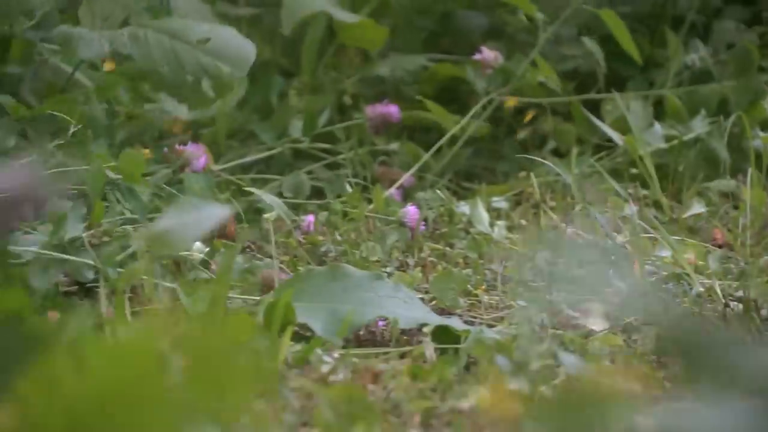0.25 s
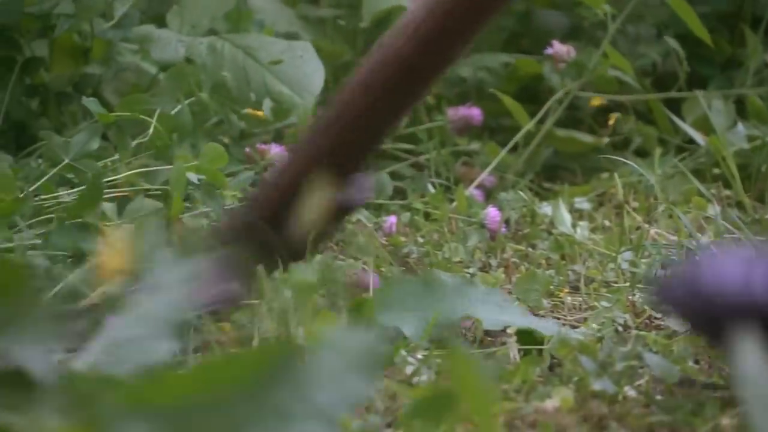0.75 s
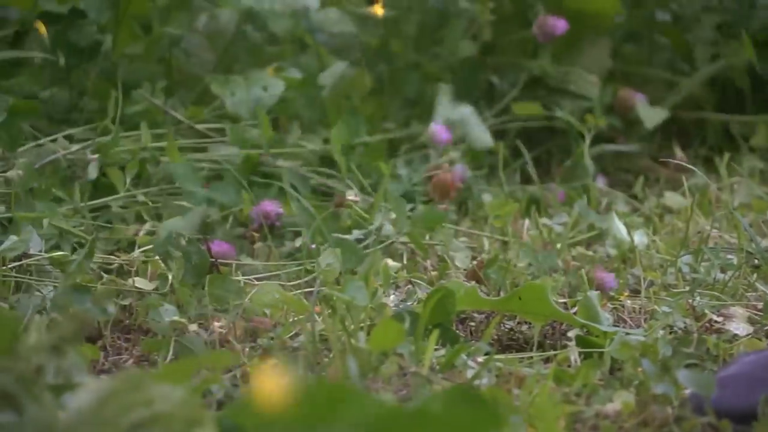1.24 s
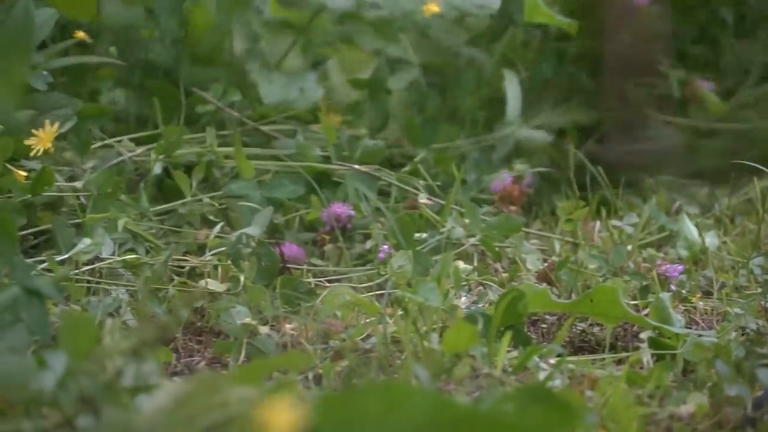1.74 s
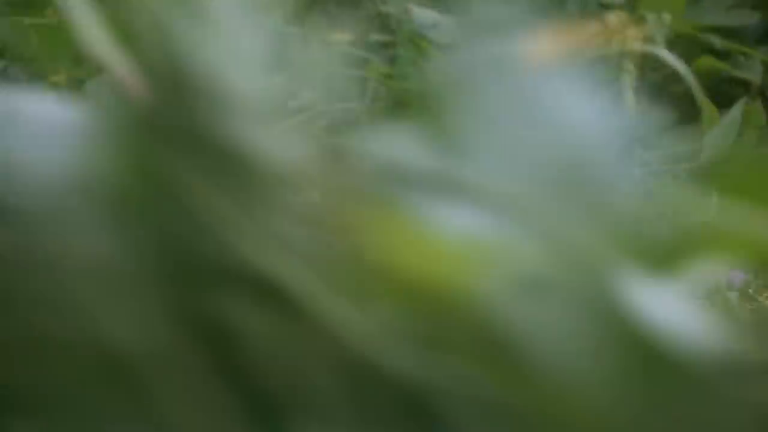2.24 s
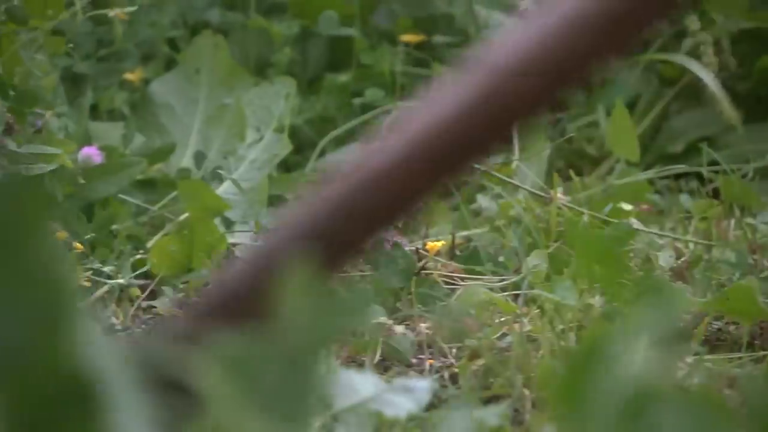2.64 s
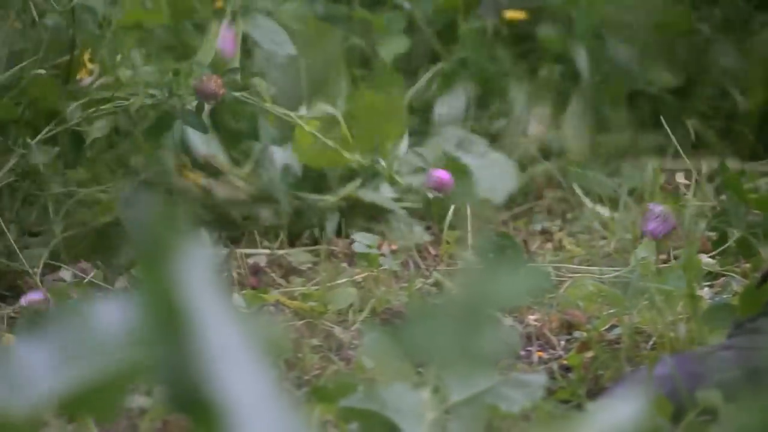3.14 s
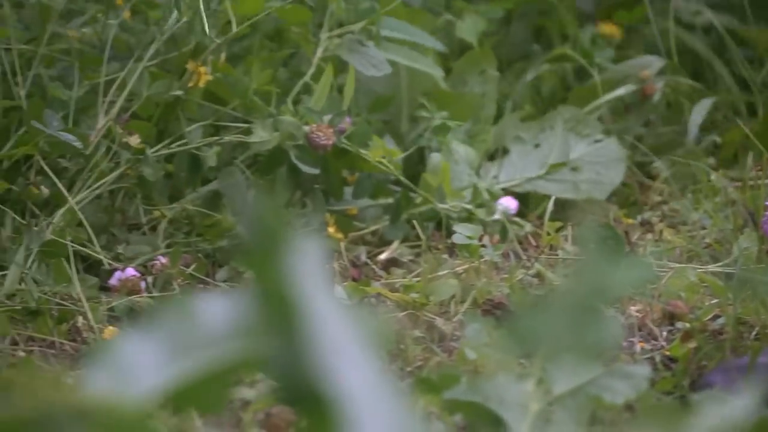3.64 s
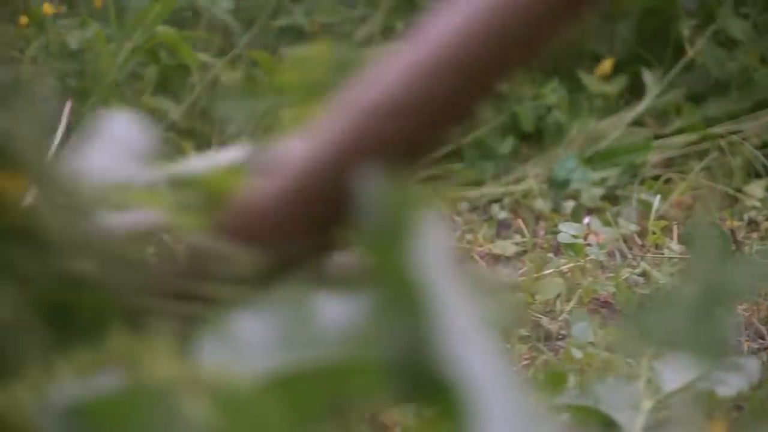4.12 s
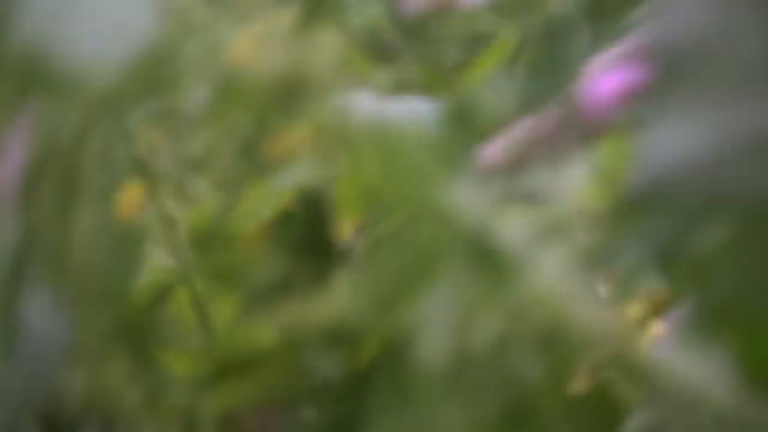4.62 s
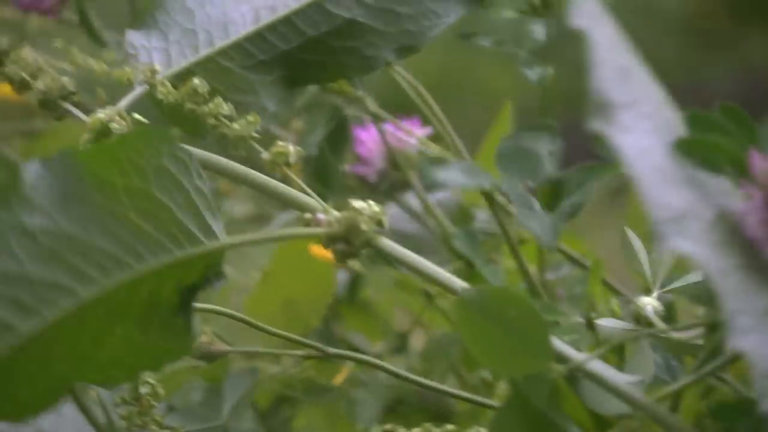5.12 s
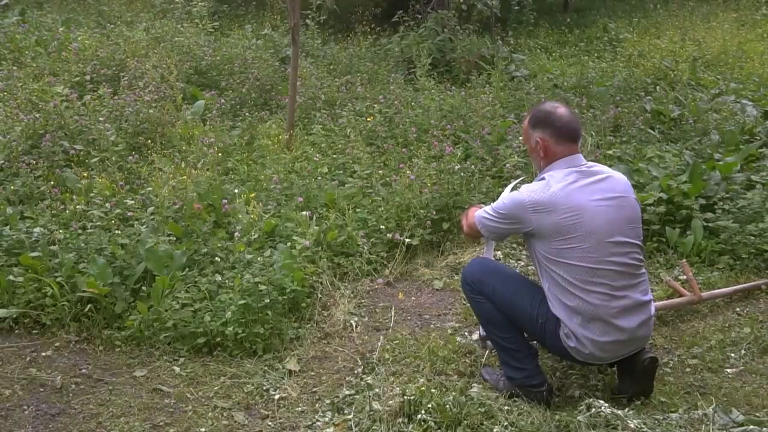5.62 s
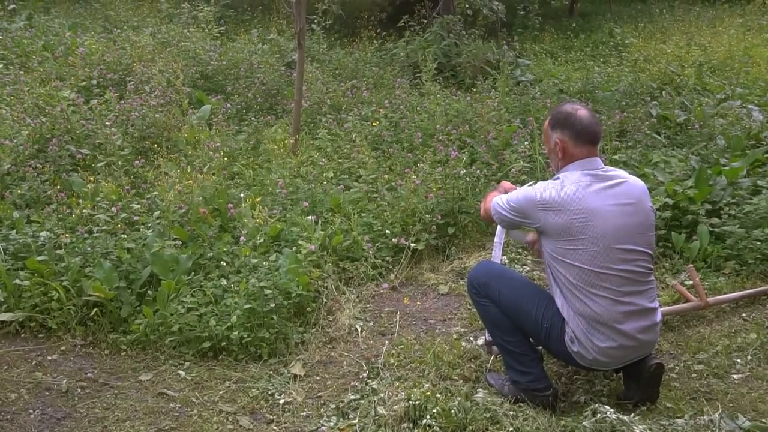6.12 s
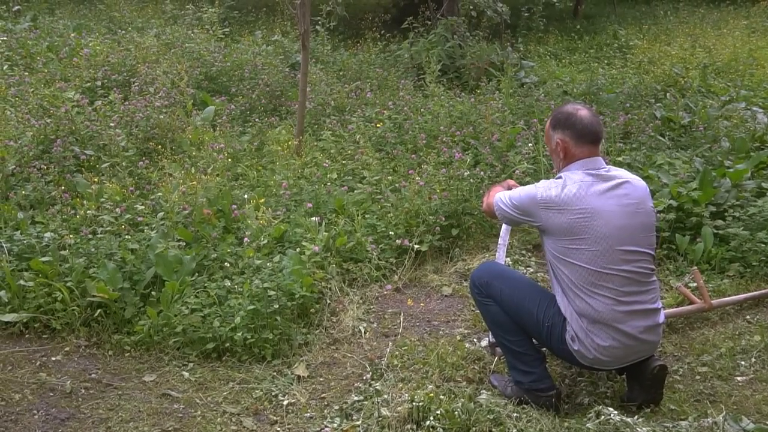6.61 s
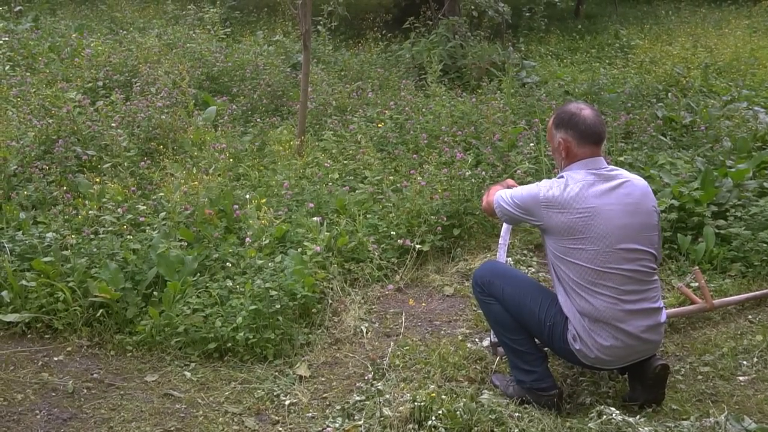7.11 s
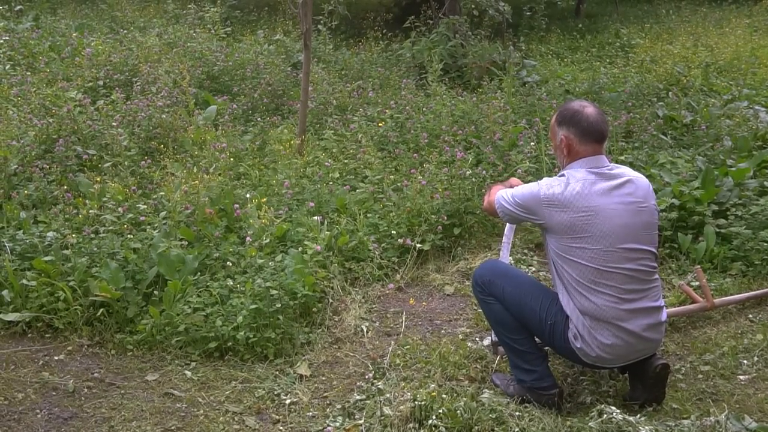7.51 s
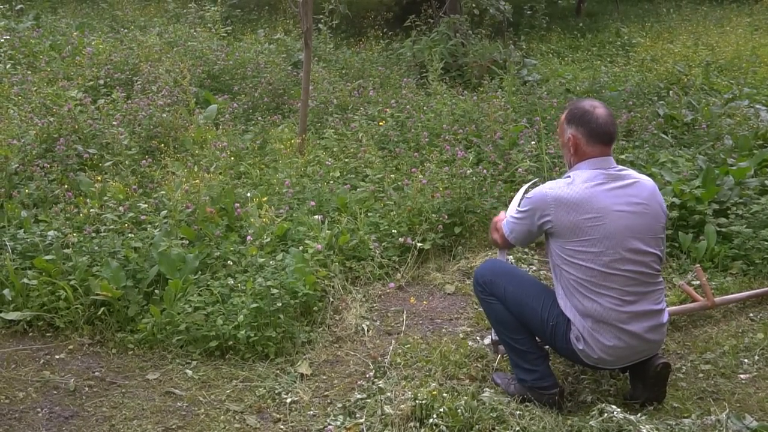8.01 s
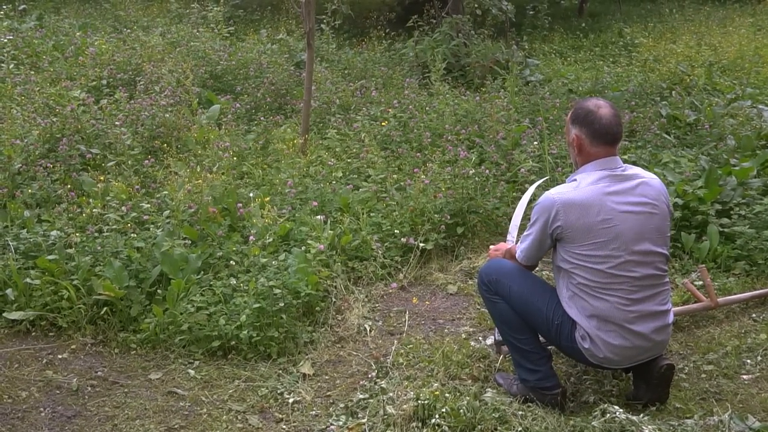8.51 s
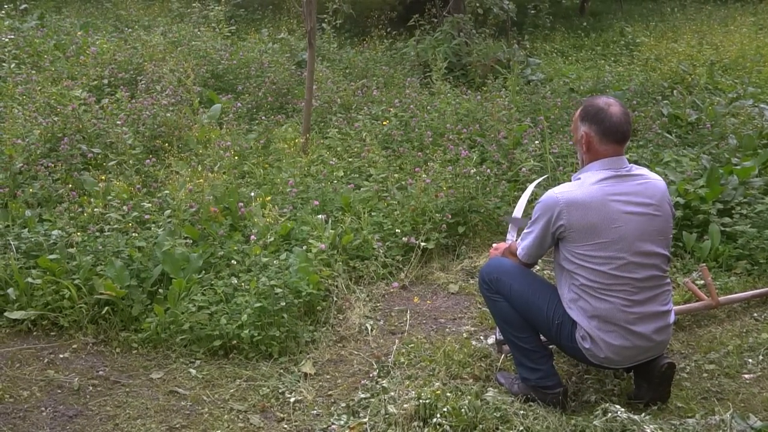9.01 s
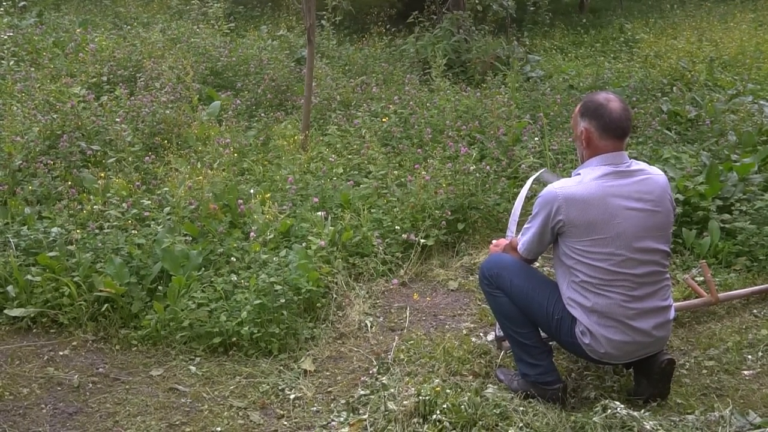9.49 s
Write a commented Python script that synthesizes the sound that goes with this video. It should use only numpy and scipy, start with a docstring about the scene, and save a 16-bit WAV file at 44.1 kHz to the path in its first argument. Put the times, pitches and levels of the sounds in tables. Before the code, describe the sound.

For the first 5.4 seconds a scythe cuts meadow weeds, heard close to the ground. Quick, uneven sweeps rustle and crunch as leaves tear, stems snap, the blade thumps dully and its back swishes over stubble. The cutting is strongest around 2 seconds and from 3.7 to 4.8. Low wind rumbles in gusts, peaking just after 3 seconds, and a distant bird whistles near 1.5.

At 5.4 seconds the sound jumps to a few steps away. A whetstone rasps along the blade in short, bright, gritty strokes, about two a second, its knocks setting the steel ringing with faint thin squeals. The strokes pause around 7.7, leaving a few dry ticks and a bird chirp, then four more with firmer knocks follow from 8.3 to 9.6. Underneath, a soft hiss of far leaves and insects slowly swells, with light wind and scattered distant bird notes.

```python
"""A scythe rustles and crunches through meadow weeds, close to the ground in a gusty breeze: leaves tear,
stems snap, the blade thumps the ground and its back swishes over stubble. Then, from a few steps away, a
whetstone rasps along the blade in short strokes, its grit and its knocks setting the steel ringing. Far
leaves and insects fill the quiet between the strokes; distant birds call in both scenes."""
import sys
import numpy as np
from scipy import signal
from scipy.fft import rfft, irfft
from scipy.io import wavfile
from scipy.ndimage import uniform_filter1d

SR = 44100
rng = np.random.default_rng(int(sys.argv[2]) if len(sys.argv) > 2 else 0)


def wrap_up_sound(samples):
    """Save the sound to the file named by the first command line argument, as 16-bit audio."""
    columns = np.atleast_2d(samples).T
    # keep every value between -1 and 1, then stretch to whole-number steps
    tamed = np.clip(columns, -1, 1)
    steps = np.round(tamed * 32767).astype(np.int16)
    wavfile.write(sys.argv[1], SR, steps)


N = 429975
CUT_S = 5.411  # the listener jumps from the grass to a few steps away

# stereo image from a few steps away: f/Hz, left-right likeness
FAR_LIKENESS = [(60, 0.99), (130, 0.87), (290, 0.86), (640, 0.76), (1410, 0.1), (3100, 0.24), (6820, 0.3),
                (15000, 0.77)]
# its tilt: f/Hz, left over right/dB
FAR_TILT = [(60, 5), (120, -5), (240, 3), (480, -2), (950, -3), (1890, -4.5), (3770, -0.5), (7520, 10),
            (15000, 1.5)]
# its phase: f/Hz, left lead/rad
FAR_LEAD = [(60, 6.1), (600, -0.5), (1120, 0), (2200, -3.5), (3190, -5.5), (9000, -9), (16000, -4)]
# the stone knocks on the steel: t/s, ring/dB, crack/dB, crack t60/s, thud/dB
STONE_KNOCKS = [(5.558, -58, -54, 0.084, -55), (5.719, -50, -52, 0.055, -57),
                (6.037, -46.5, -39.5, 0.11, -59), (6.115, -43, -40, 0.058, -51),
                (6.24, -44, -60, 0.043, -55), (6.502, -37.5, -34.5, 0.12, -50),
                (6.949, -55, -72, 0.062, -52), (7.385, -47, -58, 0.048, -49), (7.649, -55, -45, 0.052, -59),
                (8.324, -37, -42, 0.08, -41), (8.332, -39, -39, 0.13, -41), (8.456, -40, -39, .06, -47),
                (8.72, -37.5, -35, 0.11, -38), (8.845, -55, -38, 0.037, -41.5),
                (9.137, -47, -38, 0.073, -36), (9.229, -41, -38, 0.095, -42), (9.493, -52, -48, 0.078, -48),
                (9.581, -51, -33, 0.077, -55), (9.614, -49, -32.5, 0.094, -39)]


def gain_of(db):
    """Decibels to a factor."""
    return 10 ** (np.asarray(db) / 20)


def unit_rms(x):
    """Scaled to rms 1."""
    return x / np.sqrt(np.mean(x ** 2) + 1e-20)


def read(points, hz):
    """A (f/Hz, value) table on a log-frequency axis."""
    f, value = np.transpose(points)
    return np.interp(np.log(hz + 1), np.log(f + 1), value)


def curve(points):
    """A (t/s, value) table, one value a sample."""
    return np.interp(np.arange(N) / SR, *np.transpose(points))


def wander(shape, *sizes):
    """Random drift at rms 1, smoothed over each size in turn."""
    drift = rng.standard_normal(shape)
    for size in sizes:
        drift = uniform_filter1d(drift, size)
    return unit_rms(drift)


def plateau(start, end, start_db, end_db, rise, fall):
    """A level in dB that climbs at rise dB/s, slides from start to end and sinks at fall dB/s."""
    t = np.arange(N) / SR
    held = np.interp(t, [start, end], [start_db, end_db])
    return held - rise * np.maximum(start - t, 0) - fall * np.maximum(t - end, 0)


def bursts(rows):
    """Envelope of sudden blows that die away. Rows: t/s, level/dB, t60/s."""
    out = np.zeros(N)
    for start, db, t60 in rows:
        part = out[round(start * SR):][:SR // 4]
        t = np.arange(len(part)) / SR
        part += gain_of(db - 60 * t / t60) * np.minimum(t / 0.0006, 1)
    return out


def grains(grain_db, size):
    """Two white noises that share one lumpy envelope of short grains."""
    lumps = wander(N, size)
    return rng.standard_normal((2, N)) * gain_of(grain_db * lumps)


def placed(pair, likeness, tilt, lead=((0, 0), (1, 0)), patchy_db=0):
    """A noise pair spread in stereo and made patchy: a frequency column and short-time spectra."""
    hz, _, (left, other) = signal.stft(pair, SR, nperseg=512, noverlap=384)
    hz = hz[:, None]
    alike = read(likeness, hz)
    right = (alike * left + np.sqrt(1 - alike ** 2) * other) * np.exp(-1j * read(lead, hz))
    patches = uniform_filter1d(rng.standard_normal(right.shape), size=4, axis=0)
    patches = unit_rms(uniform_filter1d(patches, size=14, axis=1))
    lean = gain_of(read(tilt, hz) / 2)
    return hz, np.array([left * lean, right / lean]) * gain_of(patchy_db * patches)


def coloured(spectra, colour_db):
    """Short-time spectra back to sound through an EQ curve, the mid signal at rms 1."""
    x = signal.istft(spectra * gain_of(colour_db), SR, nperseg=512, noverlap=384)[1][:, :N]
    return x / np.sqrt(np.mean(x.mean(0) ** 2))


def band(noise, edges_hz, order):
    """Band-passed noise at rms 1."""
    bandpass = signal.butter(order, np.clip(edges_hz, 50, 18000), "band", fs=SR)
    return unit_rms(signal.lfilter(*bandpass, noise))


def clicks(rows, spread, crack_db):
    """Noise blows, each a narrow ring of its colour over a broad crack."""
    out, noise = np.zeros(N), rng.standard_normal(N)
    for start, db, hz, t60 in rows:
        at = slice(round(start * SR), round(start * SR) + SR // 4)
        ring = band(noise[at], [hz / spread, hz * spread], order=1)
        crack = band(noise[at], [hz / 2, hz * 2], order=1)
        out[at] += (ring + gain_of(crack_db) * crack) * bursts([(start, db, t60)])[at]
    return out


def whistles(rows, unsteady, fade_db):
    """Thin tones that glide, fast at first, waver and fade by fade_db (swell if negative)."""
    out = np.zeros(N)
    for start, end, start_hz, end_hz, db in rows:
        part = out[round(start * SR):round(end * SR)]
        pitch_waver, level_waver = wander((2, len(part)), 250)
        along = np.linspace(0, 1, len(part))
        glide = (end_hz + (start_hz - end_hz) * (1 - along) ** 2) * (1 + unsteady * pitch_waver)
        level = gain_of(db + 3.1 * level_waver - fade_db * along ** 2)
        part += level * signal.windows.tukey(len(part), .4) * np.sin(2 * np.pi * np.cumsum(glide) / SR)
    return out


def resonate(x, hz, width):
    """One mode, gain 1 at its centre."""
    r = np.exp(-np.pi * width / SR)
    return 2 * signal.lfilter([1 - r], [1, -r * np.exp(2j * np.pi * hz / SR)], x).real


def breeze(close):
    """Lumpy low wind rumble, nearly mono and a little louder on the left."""
    # wind strength, one curve in the grass and one a few steps away: t/s, level/dB
    strengths = [
        [(0, -49), (.3, -44), (.6, -41.5), (1.6, -40), (2.1, -38.5), (2.25, -36), (2.55, -37.5), (3.2, -26.5),
         (3.4, -32.5), (3.72, -30.5), (3.82, -40.5), (4.45, -34), (4.58, -30), (4.85, -36), (5.4, -34)],
        [(5.43, -52), (6.3, -55), (7.0, -53.5), (7.9, -54), (8.1, -52), (9.33, -46.5), (9.75, -46)],
    ]
    # rumble colour in the same two spots: f/Hz, level/dB
    gust = [(13, -30), (22, -19), (63, 1.5), (128, 2), (144, 2), (169, -10), (200, -5.5), (336, -16.5),
            (420, -20.5), (550, -23.5), (920, -120)]
    lull = [(13, -42), (22, -22), (64, 4), (103, 5.5), (266, -6), (358, -21), (420, -45), (550, -46),
            (920, -120)]
    strength, colour = (strengths[0], gust) if close else (strengths[1], lull)
    hz = np.fft.rfftfreq(N, 1 / SR)
    mid, side = irfft(rfft(rng.standard_normal((2, N))) * gain_of(read(colour, hz)), N)
    rumble = unit_rms(np.array([mid + 0.048 * side, mid - 0.025 * side]))
    return gain_of(curve(strength) + 1.37 * wander(N, 1500, 1500) + [[.9], [-1.1]]) * rumble


def leaves_and_insects():
    """Far hiss of leaves with a thin insect band, and a faint brighter hiss that comes and goes."""
    # swell of the far leaves: t/s, level/dB
    leaf_swell = [(5.42, -63.5), (6.3, -61.5), (7.0, -61.5), (7.72, -60), (8.14, -58), (8.6, -54.5),
                  (8.9, -53), (9.75, -51.5)]
    # faint bright hiss under and between the whetting strokes: start/s, end/s, level/dB
    hiss_spans = [(6.2, 6.3, -56), (7.5, 7.56, -57), (8.88, 9.52, -59.5)]
    # colours of the far leaves and of the bright hiss: f/Hz, level/dB
    leaf_colour = [(250, 0), (330, -3), (460, -14.5), (560, -10), (900, -13), (1280, -12), (1450, -18),
                   (3300, -19), (3900, -15), (5600, -21.5), (7700, -29), (8100, -27), (12000, -34),
                   (15900, -58)]
    hiss_colour = [(2500, -14), (4000, -2), (6000, 9), (9000, -3), (13000, -2), (15900, -7)]
    insect_hz, insect_width_hz, insect_db = 7550, 220, -19
    tilt = [(300, 2.3), (1300, 4.2), (8000, 8.8), (15000, 3.3)]  # f/Hz, left over right/dB
    hiss = sum(gain_of(plateau(start, end, db, db, rise=152, fall=49)) for start, end, db in hiss_spans)
    hz, noise = placed(grains(0.81, size=200), FAR_LIKENESS, tilt, patchy_db=-1.5)
    insects = coloured(noise, -20 * np.log10(1 + (2 * (hz - insect_hz) / insect_width_hz) ** 2))
    bed = coloured(noise, read(leaf_colour, hz)) + gain_of(insect_db) * insects
    return gain_of(curve(leaf_swell)) * bed + hiss * coloured(noise, read(hiss_colour, hz))


def birds():
    """Far songbirds whistle short gliding notes."""
    # notes: start/s, end/s, start f/Hz, end f/Hz, level/dB
    notes = [(1.386, 1.5, 1700, 1694, -61), (1.444, 1.595, 2500, 2370, -52.5),
             (5.28, 5.41, 2490, 2400, -60), (5.33, 5.46, 4400, 4300, -68), (7.302, 7.337, 3960, 4000, -66),
             (7.885, 7.93, 4100, 5750, -57), (7.888, 7.93, 3020, 4420, -61), (8.0, 8.06, 3930, 4400, -70),
             (8.07, 8.2, 4840, 5100, -75), (8.18, 8.3, 4000, 3800, -68), (8.2, 8.28, 5250, 5250, -68),
             (8.3, 8.32, 2010, 1960, -60), (8.57, 8.62, 2400, 2400, -62), (8.64, 8.713, 3700, 3630, -67),
             (8.91, 9.12, 582, 580, -62), (9.05, 9.13, 2000, 2150, -67), (9.34, 9.44, 2620, 2550, -62),
             (9.66, 9.75, 2200, 2200, -67)]
    return whistles(notes, unsteady=0.016, fade_db=-4.0)


def dry_ticks():
    """Small dry ticks between the strokes, left of centre."""
    # ticks: t/s, level/dB, f/Hz, t60/s
    ticks = [(5.936, -46, 5460, 0.01), (5.954, -35, 2900, 0.0099), (5.954, -35, 5700, 0.01),
             (6.009, -68, 4500, .012), (7.748, -38.5, 990, 0.014), (7.748, -49, 2180, 0.02),
             (7.872, -58, 6000, .012), (7.926, -34, 1100, 0.019), (7.926, -46, 6000, 0.01)]
    return clicks(ticks, spread=1.03, crack_db=-31) * gain_of([[2], [-2]])


def blade_squeals():
    """Single modes of the blade sing out, then fade."""
    # squeals: start/s, end/s, f/Hz, level/dB
    squeals = [(6.19, 6.35, 3170, -52), (6.5, 6.57, 3170, -50), (6.68, 6.79, 9250, -57),
               (7.05, 7.3, 3170, -54), (7.12, 7.27, 4030, -58), (7.39, 7.52, 3170, -54),
               (7.46, 7.6, 9400, -53), (7.612, 7.69, 5600, -41), (7.64, 7.76, 4030, -61),
               (8.455, 8.49, 1092, -55), (9.215, 9.26, 1080, -44)]
    notes = [(start, end, hz, hz, db) for start, end, hz, db in squeals]
    return whistles(notes, unsteady=0.0014, fade_db=14) * gain_of([[2.5], [-3]])


def blade_ring(rub):
    """The steel rings after each knock and under the rub, each mode swelling as the stone travels."""
    # modes of the hand-held blade: f/Hz, width/Hz, knocked level/dB, rubbed level/dB
    modes = [(436, 13, -23, 13), (776, 81, 4.5, 1.5), (900, 23, -14, -16), (1070, 18, -1.5, -3),
             (1246, 14, 0, -2.5), (1510, 42, -17, 2), (2030, 44, 14, -6), (2680, 53, 3.5, -28),
             (3135, 27, 0.5, 6.5), (3320, 45, -12, 5), (3520, 46, -16, -8), (4070, 12, -15, 3),
             (4700, 30, -17, 3), (5060, 43, 0.5, -22), (5550, 20, -14, 0), (6400, 20, -4, 6),
             (6500, 43, -5, -20), (6800, 64, -5, 0), (8020, 37, -19, -22.5), (9100, 81, -1, 5.5),
             (9560, 110, -9, -16)]
    out, t = np.zeros((2, N)), np.arange(SR // 8) / SR
    cut = round(CUT_S * SR)
    for hz, width, _, rub_db in modes:
        travel = wander(N // 1024 + 2, 4)
        drive_db = rub_db + 3 * np.interp(np.arange(cut, N) / 1024, np.arange(len(travel)), travel)
        out[:, cut:] += resonate(rub[:, cut:] * gain_of(drive_db), hz, width)
    hz, width, knock_db, _ = np.transpose(modes)[:, :, None]
    lean_db, lead = read(FAR_TILT, hz) / 2, read(FAR_LEAD, hz) / 2
    decay = np.exp(-np.pi * width * t) * np.minimum(t / 0.00075, 1)
    for start, ring_db, *_ in STONE_KNOCKS:
        force, offset, _ = rng.random((3, len(modes), 1))
        level = gain_of(ring_db + knock_db + 3.2 * (force - 1.5)) * decay
        for side, sign in enumerate((1, -1)):
            phase = 2 * np.pi * (hz * t + offset) + sign * lead
            part = out[side, round(start * SR):][:len(t)]
            part += (level * gain_of(sign * lean_db) * np.sin(phase)).sum(0)[:len(part)]
    return out


def knocks(hz, noise):
    """The stone cracks against the steel; hand and haft take the blow with a dull thud."""
    # colour of the crack: f/Hz, level/dB
    crack_colour = [(180, -12), (300, -17), (1130, 7), (2310, -36), (2560, -5.5), (3450, 11), (4650, -2),
                    (5770, -14), (13200, -28), (15900, -52)]
    thud_hz, thud_t60_s = (207, 488), 0.069
    cracks = bursts([(start, db, t60) for start, _, db, t60, _ in STONE_KNOCKS])
    thuds = bursts([(start, db, thud_t60_s) for start, *_, db in STONE_KNOCKS])
    thuds = uniform_filter1d(thuds, size=130, origin=64)  # softens the attack
    dull = band(rng.standard_normal(N), thud_hz, order=2)
    return cracks * coloured(noise, read(crack_colour, hz)) + thuds * dull


def whetting():
    """The stone lands and drags its grit over the steel with rising pressure, exciting the blade."""
    # strokes: land/s, lift/s, landing/dB, first grit/dB, grit at lift/dB, fade/(dB/s),
    # body/dB re grit, top hiss/dB re grit
    strokes = [(5.559, 5.718, -50, -48.5, -39.5, 293, -15.5, -3),
               (6.039, 6.234, -35, -52, -32, 417, -17, -2),
               (6.506, 6.687, -32.5, -46.5, -37, 390, -14.5, 0),
               (6.953, 7.135, -62.5, -49, -32, 313, -18, -1), (7.386, 7.56, -35, -45, -37, 350, -16, -0.5),
               (7.614, 7.641, -55, -52, -43, 266, -18.5, -3),
               (8.321, 8.461, -31, -46.5, -35.5, 260, -13.5, -0.5),
               (8.719, 8.834, -35, -42.5, -34.5, 342, -13, 2),
               (9.135, 9.233, -38, -41.5, -33, 245, -13.5, 1), (9.493, 9.57, -35, -42, -31, 226, -17.5, 2)]
    # colours of the grit, the blade's body and the top hiss: f/Hz, level/dB
    grit_colour = [(1470, -76), (2500, -8), (3020, -5.5), (3280, -5), (3710, -6), (4110, -1), (4530, -4.5),
                   (5670, 5), (8500, -3.5), (11000, -31), (18700, -120)]
    body_colour = [(210, -15), (350, -3), (430, -21), (593, -21), (777, -5.5), (872, -18.5), (1060, -0.5),
                   (1730, -7), (2500, -9.5), (3250, -43), (5500, -120)]
    hiss_colour = [(5000, -98.5), (8500, 2.5), (10200, 11.5), (11900, 5), (15100, -1), (15900, 6.5)]
    land_t60_s, jolt_s, jolt_db, light_hiss_db = 0.036, 0.021, 1, -4
    linger_db, linger_db_per_s = -30.5, 120  # faint grit hangs on after the lift
    t, levels = np.arange(N) / SR, np.zeros((3, N))
    for land, lift, land_db, start_db, lift_db, fall, body_db, hiss_db in strokes:
        at = slice(round(land * SR), round(lift * SR) + SR // 2)
        since, after = t[at] - land, np.maximum(t[at] - lift, 0)
        pressure = np.clip(since / (lift - land), 0, 1)
        landing = gain_of(land_db - 60 * since / land_t60_s)
        drag = gain_of(start_db + (lift_db - start_db) * pressure - fall * after)
        linger = gain_of(lift_db + linger_db - linger_db_per_s * after) * pressure
        grit = (landing + drag + linger) * np.clip(since / 0.0012, 0, 1)
        jolt = np.exp(-(since / jolt_s) ** 2) + np.exp(-((t[at] - lift) / jolt_s) ** 2)
        levels[0, at] += grit
        levels[1, at] += grit * gain_of(body_db + jolt_db * jolt)
        levels[2, at] += grit * gain_of(hiss_db + light_hiss_db * (1 - pressure))
    hz, noise = placed(grains(1.34, size=30), FAR_LIKENESS, FAR_TILT, FAR_LEAD, patchy_db=1.7)
    colours = grit_colour, body_colour, hiss_colour
    rub = sum(level * coloured(noise, read(colour, hz)) for level, colour in zip(levels, colours))
    return rub + knocks(hz, noise) + blade_ring(rub) + blade_squeals()


def ground_echo(x):
    """An inverted dull echo and its repeats comb narrow dips into the low mids."""
    comb_hz, lowpass_hz, share = 453.7, 1120, 0.84
    hz = np.fft.rfftfreq(N, 1 / SR)
    echo = share / (1 + (hz / lowpass_hz) ** 4) * np.exp(-2j * np.pi * hz / comb_hz)
    return irfft(rfft(x) * (1 - echo) / (1 - 0.36 * echo), N)


def stubble_swishes():
    """The blade's back slides over stubble: narrow grainy noise riding on a gliding pitch."""
    # slides: start/s, end/s, start f/Hz, end f/Hz, level/dB
    slides = [(.0, 0.345, 1800, 2024, -47), (0.749, 0.903, 1700, 1890, -47), (.92, 1.05, 1450, 1536, -48),
              (1.559, 1.778, 2210, 1850, -50), (1.657, 1.86, 1950, 1340, -45.5),
              (1.781, 1.943, 1380, 1288, -37), (1.956, 2.105, 1700, 1915, -39),
              (2.2, 2.372, 1900, 1650, -61), (2.96, 3.16, 1470, 1490, -43.5),
              (3.58, 3.816, 1850, 1970, -46.5), (3.678, 3.796, 2600, 2510, -37.5),
              (3.724, 3.813, 1453, 1406, -30.5), (3.826, 3.983, 1330, 1333, -31),
              (3.952, 4.116, 1963, 1650, -37), (4.17, 4.494, 2030, 1927, -38.5),
              (4.536, 4.76, 1950, 1805, -51.5), (4.959, 5.216, 1390, 1216, -47.5)]
    out = np.zeros(N)
    slow = signal.lfilter(*signal.butter(2, 150, fs=SR), grains(2.0, size=300))
    flutter = unit_rms(slow[0]) + 1j * unit_rms(slow[1])
    for start, end, start_hz, end_hz, db in slides:
        at = slice(round(start * SR), round(end * SR))
        glide = np.linspace(start_hz, end_hz, len(out[at]))
        carrier = np.exp(2j * np.pi * np.cumsum(glide) / SR)
        out[at] += gain_of(db) * (flutter[at] * carrier).real * signal.windows.tukey(len(glide), .6)
    return out


def snaps_and_thumps():
    """Stems snap and the blade thumps dully against the ground."""
    # hits on stems and ground: t/s, level/dB, f/Hz, t60/s
    hits = [(.617, -39, 1180, 0.09), (.99, -35.5, 1390, 0.11), (1.255, -34, 310, 0.096),
            (1.255, -48, 600, 0.065), (1.255, -53, 1460, 0.032), (1.799, -34, 1260, 0.11),
            (1.896, -24, 1370, 0.12), (2.045, -25.5, 1830, 0.15), (2.164, -34, 3200, 0.09),
            (2.553, -32, 2780, .04), (2.553, -28.5, 1180, 0.028), (2.72, -47, 2500, 0.039),
            (2.775, -42, 2000, 0.031), (3.04, -39, 1510, 0.073), (3.752, -31, 660, .05),
            (3.758, -32, 1310, .09), (3.796, -30, 2970, .03), (3.925, -22, 634, 0.048),
            (4.093, -24, 694, 0.033), (3.799, -31, 1430, .08), (4.199, -27.5, 2350, 0.15),
            (4.772, -25.5, 1930, 0.11), (4.772, -35, 1150, 0.068), (4.772, -41, 4140, 0.08),
            (4.856, -21, 8340, 0.012), (4.858, -35, 4400, 0.033)]
    return clicks(hits, spread=1.04, crack_db=-10)


def mowing():
    """Stems and leaves tear over the scrape of the blade; thick and thin tufts make it flicker."""
    # cuts and drags back: full from/s, to/s, first rustle/dB, last rustle/dB,
    # scrape/dB re rustle, fizz/dB re rustle
    sweeps = [(0.0, .25, -33, -37.5, -2.5, -2), (0.486, .56, -50, -55, -3, 3.5),
              (0.627, 1.02, -41, -42.5, -2.5, -2.5), (1.124, 1.258, -56, -51, 1, -2),
              (1.823, 2.063, -34, -32.5, -0.5, -4.5), (2.157, 2.365, -31, -34.5, -2.5, -2.5),
              (2.424, 2.574, -38, -39.5, 0.5, 0.5), (2.688, 2.817, -41, -40.5, -1.5, -6),
              (3.032, 3.298, -37.5, -45, -1, -2), (3.752, 3.775, -34.5, -31, -1.5, -3.5),
              (3.915, 4.095, -30, -33.5, -1.5, -4.5), (4.192, 4.394, -31, -35, -1.5, -4),
              (4.562, 4.81, -38.5, -39.5, -0.5, -4), (4.94, 5.162, -37, -45, -4, -1.5),
              (5.263, 5.412, -66.5, -56, 5.5, -10)]
    # colours of the bright rustle, the low scrape and the fizz on top: f/Hz, level/dB
    rustle = [(1530, -63), (2600, -5), (8000, -7), (10400, -14), (17600, -120)]
    scrape = [(190, 4.5), (330, 1), (520, 4.5), (780, 3), (1240, 4), (1900, 7), (2300, 4.5), (2800, -19.5),
              (3400, -39.5), (5700, -110)]
    fizz = [(4710, -38), (8000, -17), (9160, -4.5), (11600, 3.5), (15100, 3), (15900, 3.5)]
    # close stereo image: f/Hz, left-right likeness
    likeness = [(60, 0.99), (130, 0.85), (290, 0.98), (640, 0.97), (1410, 0.87), (3100, 0.63), (6820, 0.07),
                (15000, 0.17)]
    # its tilt: f/Hz, left over right/dB
    tilt = [(60, 7), (130, 0), (290, 2.5), (640, 0.4), (1410, 0.8), (3100, 1.1), (6820, 2.5), (15000, -2)]
    tuft_s, flicker_db = .025, (1.0, 1.5, .6)  # depth for rustle, scrape, fizz
    breaks_per_s, break_db, break_s = 40, -5.5, 0.0018  # thin stalks break at random
    powers = np.zeros((3, N))
    for start, end, start_db, end_db, scrape_db, fizz_db in sweeps:
        level_db = plateau(start, end, start_db, end_db, rise=79, fall=75)  # into and out of the weeds
        powers += gain_of(level_db + [[0], [scrape_db], [fizz_db]]) ** 2
    tufts = wander(N, round(tuft_s * SR), 300)
    breaks = (rng.random(N) < breaks_per_s / SR) * rng.exponential(1, N)
    crackle = 1 + gain_of(break_db) * signal.lfilter([1], [1, -np.exp(-1 / (break_s * SR))], breaks)
    hz, noise = placed(grains(0.7, size=25) * crackle, likeness, tilt, patchy_db=1.0)
    return sum(gain_of(db * tufts) * np.sqrt(power) * coloured(noise, read(colour, hz))
               for db, power, colour in zip(flicker_db, powers, (rustle, scrape, fizz)))


def scene():
    """The mowing up close, then the whetting from a few steps away, with birds over both."""
    scythe = ground_echo(mowing() + stubble_swishes() + snaps_and_thumps())
    near = scythe + breeze(close=True)
    far = whetting() + leaves_and_insects() + dry_ticks() + breeze(close=False)
    crossfade = np.clip((np.arange(N) / SR - CUT_S) / .002, 0, 1)
    return (1 - crossfade) * near + crossfade * far + birds()


def record(dry):
    """A steep low-pass trims the highest treble."""
    lowpass = signal.firwin(511, 15950, window=("kaiser", 9), fs=SR)
    return signal.oaconvolve(dry, lowpass[None], "same")


dry = scene()
out = record(dry)
wrap_up_sound(out)
```